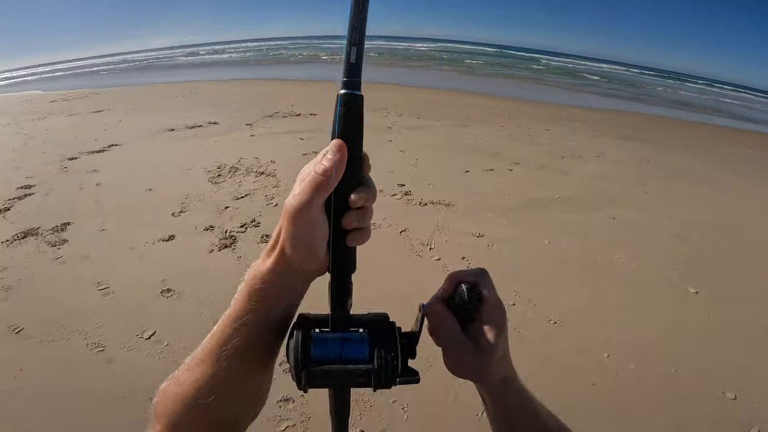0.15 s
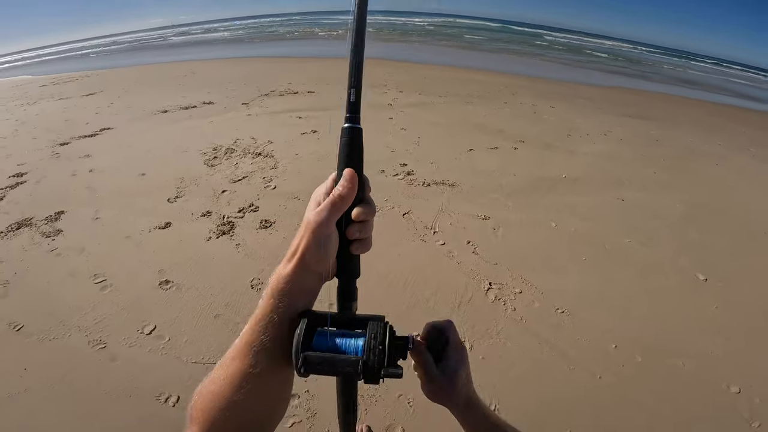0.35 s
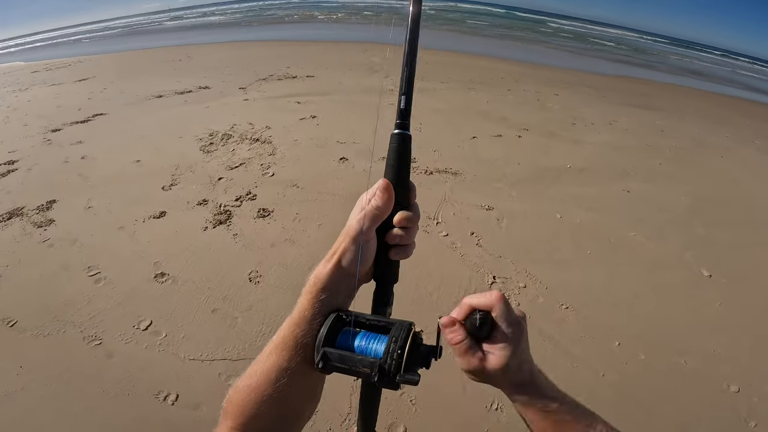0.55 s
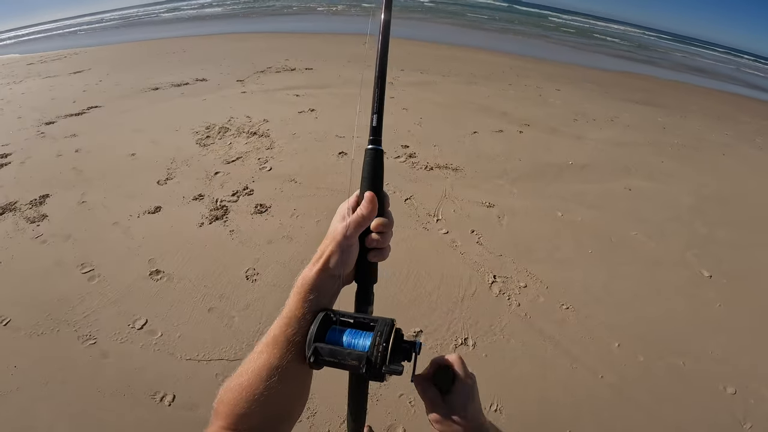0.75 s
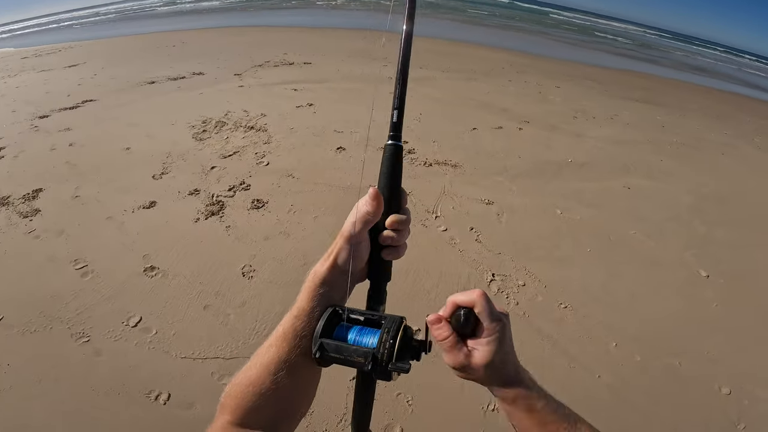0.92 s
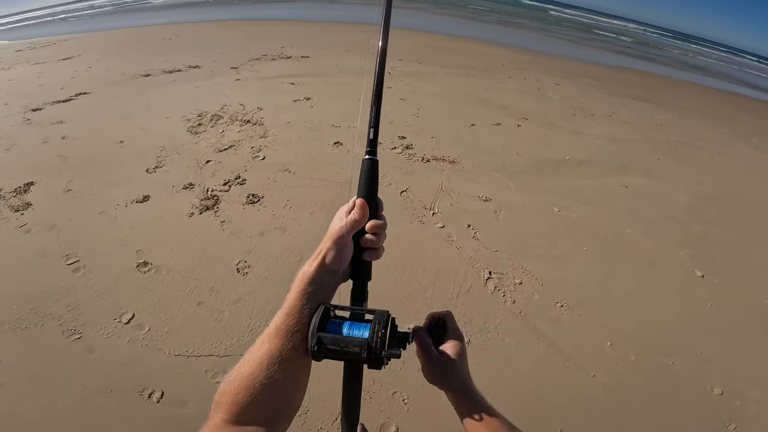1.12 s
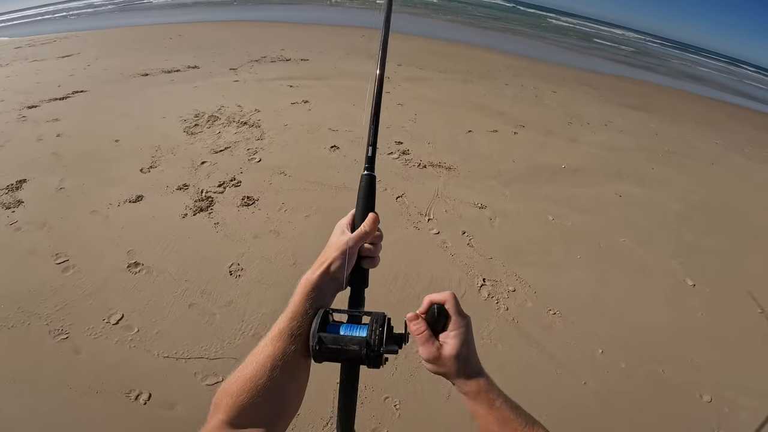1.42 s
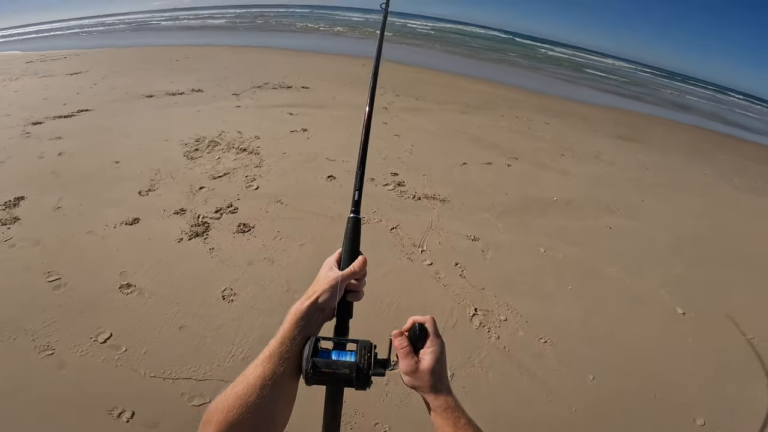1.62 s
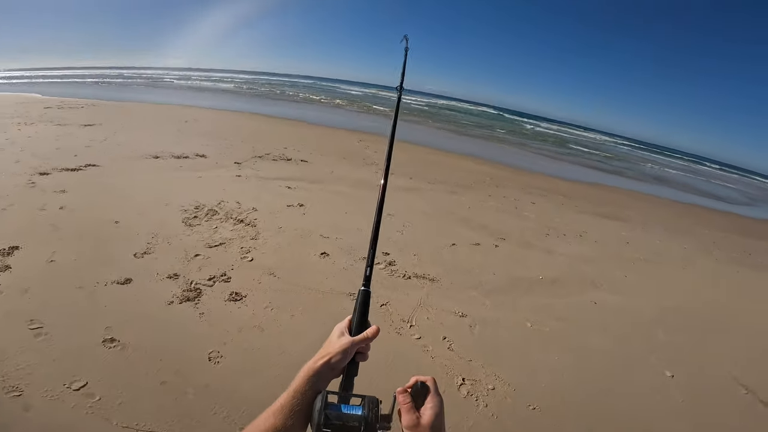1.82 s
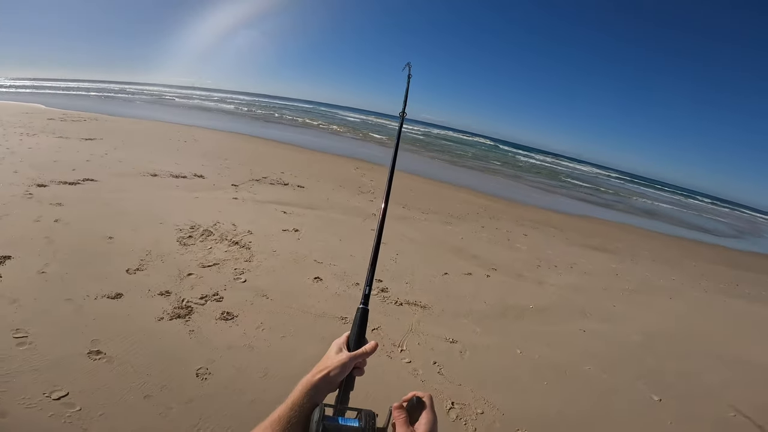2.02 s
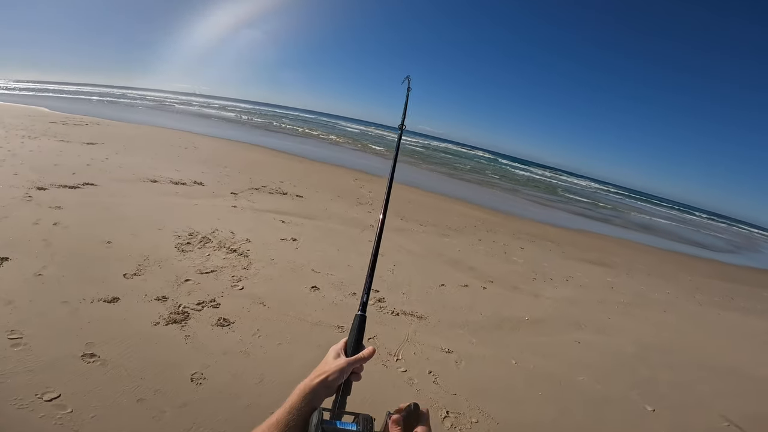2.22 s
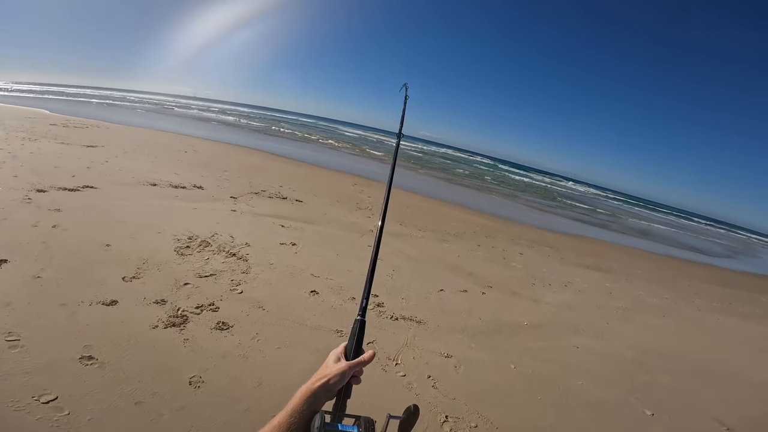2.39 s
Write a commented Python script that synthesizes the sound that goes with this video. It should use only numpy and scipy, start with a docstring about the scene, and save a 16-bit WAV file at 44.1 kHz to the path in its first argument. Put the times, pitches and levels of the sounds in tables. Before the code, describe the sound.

A fishing reel's clicker ticks, then buzzes in surges as line runs out on a windy beach

```python
"""Fishing reel on a beach

An overhead reel clicks close to a body-worn camera: its pawl ticks three times, then buzzes as line is pulled
off in surges, stops for a moment and runs on more evenly. Each click is a burst of noise plus ringing tones,
timed by the turning spool. Running line adds hiss. Shaped noise makes the surf, the wind and its low roar, with
short pulses for the buffets."""
import sys
import numpy as np
from scipy import signal
from scipy.fft import rfft, irfft
from scipy.io import wavfile
from scipy.ndimage import uniform_filter1d

SR = 44100
rng = np.random.default_rng(int(sys.argv[2]) if len(sys.argv) > 2 else 0)


def unload_wav(signal):
    """Save mono or channel-first audio to the path in sys.argv[1] as 16-bit WAV at rate SR, clipped to [-1, 1]."""
    wavfile.write(
        sys.argv[1],
        SR,
        np.round(np.clip(np.atleast_2d(signal).T, -1, 1) * 32767).astype(np.int16),
    )


N = 112454  # length in samples


def amp(db):
    """Turns decibels into gain."""
    return 10 ** (np.asarray(db) / 20)


def unit(x):
    """Scales a sound to rms 1."""
    return x / np.sqrt(np.mean(x ** 2) + 1e-20)


def at_hz(points, hz):
    """Reads a curve over frequency, on a logarithmic axis."""
    f, value = np.transpose(points)
    return np.interp(np.log(hz + 1), np.log(f + 1), value)


def at_time(points, s):
    """Reads a curve over time."""
    return np.interp(s, *np.transpose(points))


def add(mix, s, sound):
    """Mixes a stereo sound in at time s."""
    part = mix[:, max(round(s * SR), 0):][:, :sound.shape[1]]
    part += sound[:, :part.shape[1]]


def pair(noise, same):
    """Makes two independent noises partly alike (0 = unrelated, 1 = identical)."""
    same = np.clip(same, 0, 1)
    right = same * noise[0] + np.sqrt(1 - same ** 2) * noise[1]
    return np.array([noise[0], right])


def air(spectrum, level, same, flutter_db=0, flutter_hz=20):
    """Coloured stereo noise that follows a level curve and can flutter at random."""
    hz = np.fft.rfftfreq(N, 1 / SR)
    white = pair(rng.standard_normal((2, N)), same)
    noise = irfft(rfft(white) * amp(at_hz(spectrum, hz)), N)
    slow = np.exp(-(hz / flutter_hz) ** 2)
    flutter = unit(irfft(rfft(rng.standard_normal(N)) * slow, N))
    fluttering = unit(noise * amp(flutter_db * flutter))
    return fluttering * amp(at_time(level, np.arange(N) / SR))


# how far the left port leads the right: (frequency [Hz], phase [radians])
PORT_PHASE = [(30, -0.25), (500, -0.45), (3000, -0.92), (5300, -0.54), (8000, -0.32), (12000, 0.58)]


def ports(x, balance):
    """A sound reaches the two microphone ports with different level and phase."""
    hz = np.fft.rfftfreq(N, 1 / SR)
    # each port takes half of the difference, in opposite directions
    half = amp(at_hz(balance, hz) / 2) * np.exp(1j * at_hz(PORT_PHASE, hz) / 2)
    return irfft(rfft(x) * np.array([half, 1 / half]), N)


# colour of the surf: (frequency [Hz], relative level [dB per Hz])
SURF_COLOUR = [(100, -0.5), (220, 0), (400, -7), (750, -11.5), (960, -4), (1400, -11.5), (2300, -17.5),
               (3200, -24.5), (4500, -24.5), (6500, -30.5), (9000, -45), (14000, -50)]
# loudness of the surf: (time [s], level [dB])
SURF_LEVEL = [(0, -32.5), (.26, -33.5), (.33, -36), (1.0, -39), (1.5, -40), (1.63, -36), (1.75, -35),
              (2.55, -35)]


def surf():
    """The even wash of breakers down the beach: gently fluttering noise."""
    wash = air(SURF_COLOUR, SURF_LEVEL, same=0.88, flutter_db=1.72, flutter_hz=22)
    return ports(wash, [(200, -0.067), (1300, 0.64)])  # (Hz, left minus right dB)


# colour of the wind's low roar: (frequency [Hz], relative level [dB per Hz])
WIND_ROAR_COLOUR = [(80, -22), (230, 1), (450, 4.5), (750, -3.5), (2000, -44.5)]
# loudness of the wind's roar: (time [s], level [dB])
WIND_ROAR_LEVEL = [(0, -41.5), (.25, -37.5), (.35, -49.5), (1.45, -53), (1.6, -42.5), (1.72, -45.5),
                   (2.1, -42.5), (2.55, -43)]


def wind_roar():
    """The low-mid turbulence of the wind: low noise, only partly alike on the two sides."""
    return air(WIND_ROAR_COLOUR, WIND_ROAR_LEVEL, same=0.61)


# colour of the wind on the microphone: (frequency [Hz], relative level [dB per Hz])
WIND_COLOUR = [(3, -6.5), (10, 2.5), (22, -11), (45, -14.5), (100, -23.5), (180, -25.5), (400, -38.5),
               (1500, -108)]
# loudness of the wind: (time [s], level [dB])
WIND_LEVEL = [(0, -21.5), (.12, -22.5), (.25, -18.5), (.36, -22), (.55, -30.5), (.85, -22), (1.08, -28),
              (1.28, -22.5), (1.38, -20.5), (1.52, -25), (1.72, -25.5), (2.0, -26), (2.2, -29), (2.55, -28)]
# sharp buffets of wind: (time [s], peak level before the ports [dB], half width [s])
BUFFETS = [(0.205, -13.5, 0.0024), (.43, -22, 0.0026), (1.004, -21, 0.0034), (1.182, -22.5, 0.0036),
           (1.42, -18.5, 0.0025), (1.659, -21, 0.0032), (1.757, -18.5, 0.0023), (2.003, -22.5, 0.0035)]


def wind():
    """Wind pressing on the microphone: lumpy rumble with a few sharp pulses of pressure."""
    out = air(WIND_COLOUR, WIND_LEVEL, same=0.96)
    for s, db, width in BUFFETS:
        u = (np.arange(N) / SR - s) / width
        # a dip with a small rise on either side
        out = out - amp(db) * (1 - u ** 2) * np.exp(-u ** 2 / 2)
    return ports(out, [(25, -4.0), (90, -4.5), (250, 1.0)])  # (Hz, left minus right dB)


def tooth_times(pull):
    """The pawl drops each time the spool has turned by one tooth."""
    t = np.arange(pull[0][0], pull[-1][0], 1 / SR)
    teeth = np.cumsum(at_time(pull, t)) / SR
    return np.interp(np.arange(int(teeth[-1]) + 1), teeth, t)


EVENNESS = 0.65  # how alike the teeth are in colour (0-1)


def evened(burst, size=56):
    """Partly flattens a burst's broad humps, so that every tooth strikes with much the same colour."""
    z = rfft(burst)
    power = (abs(z) ** 2).mean(0)
    humps = uniform_filter1d(uniform_filter1d(power, size), size)
    return irfft(z / np.sqrt(humps) ** EVENNESS, burst.shape[1])


# left-right likeness of the clicks: (frequency [Hz], likeness [0-1])
REEL_SAME = [(1000, 0.99), (6500, 1), (10000, 0.67), (13000, 0.55)]
# ringing metal parts of the reel: (frequency [Hz], time to fall 60 dB [s], then typical level [dB]
# in the first surge, the later surges, the easing pull and the even pull)
REEL_MODES = [(1633, 0.039, -30, -32, -35, -55), (2094, 0.023, -34, -37, -38, -29),
              (2834, 0.031, -27.5, -26.5, -32, -30), (3926, 0.043, -23, -55, -45, -41),
              (4674, 0.036, -39, -28, -28, -39), (6120, 0.04, -42, -36, -50, -31),
              (7880, 0.04, -42, -33, -41, -29), (10340, 0.042, -28, -26, -27, -30.5)]
# ends of the first three of those stages: (time [s])
STAGE_ENDS_S = [.46, 1.07, 1.6]

CLICK_DB, SPREAD_DB = -6.5, 1.11  # base strength of a click and its random spread
LIKENESS = 0.71  # how much a click's noise resembles the one before (0-1)
# the pawl rides over a tooth, drops, and dies away: typical times, which vary from click to click
SCRAPE_S, HOLD_S, SNAP_S = 0.00059, 0.001, 0.00056
SHORTENING_PER_DB = .1  # a harder snap is over sooner
BODY_DB, BODY_S = -13, 0.006  # after-ring of the frame, weaker for soft ticks
TOOTH_COLOUR_DB, TOOTH_COLOUR_HZ = 4, 690  # no two teeth are worn alike: random tint, spacing of its bumps
LENGTH_SPREAD, JITTER_S = 0.33, .00008  # teeth differ in click length (share) and in spacing
RING_SPREAD_DB, RING_DETUNE = 2.5, 0.0038  # each ring varies in level and pitch (share)
RING_GROWTH = 0.96  # extra dB the ring loses per dB of softness


def pawl(clicks, size=2600):
    """Each drop of the pawl gives a short burst of metal chatter and sets the reel's parts ringing."""
    lead = SR // 400 / SR  # room before the drop for the scrape, s
    t, hz = np.arange(size) / SR - lead, np.fft.rfftfreq(size, 1 / SR)
    after, same = np.maximum(t, 0), at_hz(REEL_SAME, hz)
    chatter, ring = np.zeros((2, 2, N))
    grain = rng.standard_normal((2, size))
    for s, db in clicks:
        softness, hardness = min(db, 0), max(db, 0)
        # part of the last click's noise lives on in this one
        grain = LIKENESS * grain + np.sqrt(1 - LIKENESS ** 2) * rng.standard_normal((2, size))
        bumps = rng.standard_normal(size=48)
        tint = amp(TOOTH_COLOUR_DB * np.interp(hz / TOOTH_COLOUR_HZ, np.arange(len(bumps)), bumps))
        # stretched time makes some clicks shorter than others
        u = t * np.exp(LENGTH_SPREAD * rng.standard_normal() + SHORTENING_PER_DB * hardness)
        scrape = np.exp(np.minimum(u, 0) / SCRAPE_S)
        snap = np.exp(-np.maximum(u - HOLD_S, 0) / SNAP_S)
        body = amp(BODY_DB + RING_GROWTH * softness) * np.exp(-after / BODY_S)
        noise = irfft(pair(rfft(grain), same) * tint, size)
        burst = evened(noise * scrape * (snap + body))
        strength = amp(CLICK_DB + db + SPREAD_DB * rng.standard_normal())
        start = s - lead + JITTER_S * rng.standard_normal()
        add(chatter, start, 2 * strength * burst / np.linalg.norm(burst[0]))
        # soft ticks barely excite the ring; hard ones add only snap
        ring_strength = strength * amp(RING_GROWTH * softness - hardness)
        for mode_hz, t60, *stage_db in REEL_MODES:
            mode_db = stage_db[np.searchsorted(STAGE_ENDS_S, s)] + RING_SPREAD_DB * rng.standard_normal()
            tone_hz = mode_hz * (1 + RING_DETUNE * rng.standard_normal())
            fade = np.exp(-np.log(1000) * after / t60)
            mode = amp(mode_db) * fade * np.sin(2 * np.pi * tone_hz * after)
            add(ring, start, ring_strength * np.array([mode, mode]))
    return chatter, ring


def ringing(colour, size=2048):
    """A short response of energy 1 with the given colour, starting at once like a struck object."""
    log_gain = np.log(amp(at_hz(colour, abs(np.fft.fftfreq(size, 1 / SR)))))
    # the Hilbert transform gives the phase that puts the energy as early as possible
    response = np.fft.ifft(np.exp(np.conj(signal.hilbert(log_gain)))).real[:size // 2]
    return response / np.linalg.norm(response)


# wandering colour of the clicks: (time [s], gain of the lower band [dB], gain of the upper band [dB])
WANDER = [(.1, 10, 7.5), (.277, -4.5, -1.5), (.32, -7.5, 0.5), (.38, -1, -4.5), (.46, -10, 3),
          (.52, 2.5, -1.5), (.59, -2, 0.5), (.66, 3.5, -2), (.71, 4, -0.5), (.77, -12, 5.5), (.83, -4, 3.5),
          (.9, 1, -3), (.97, -7, 3), (1.04, 3, 0.5), (1.11, -11, 2), (1.2, 1, 2.5), (1.5, -1, 1.5),
          (1.72, -2, -1.5), (1.9, 1.5, -2.5), (2.15, 5, 2.5), (2.55, 4, 1.5)]
WANDER_HZ, WANDER_WIDTH_HZ = (3750, 5220), 830  # band centres and width


def wander(x):
    """Lets two middle bands of the clicks swell and sink."""
    hz, t = np.fft.rfftfreq(N, 1 / SR), np.arange(N) / SR
    times, *gains_db = np.transpose(WANDER)
    out = x
    for centre, db in zip(WANDER_HZ, gains_db):
        band = irfft(rfft(x) * np.exp(-((hz - centre) / WANDER_WIDTH_HZ) ** 2), N)
        out = out + band * (amp(np.interp(t, times, db)) - 1)
    return out


# single ticks while the line only creeps: (time [s], level relative to the base click [dB])
TICKS = [(.0707, -16), (.146, -14), (.162, -12), (1.6572, 0.5), (1.6774, 3), (1.6955, 3), (1.7095, 1.5),
         (1.7212, 0), (1.73, 0)]
# spool speed in the surging and in the even pull: (time [s], speed [teeth per second])
SURGING_PULL = [(0.277, 51.3), (0.302, 68.7), (0.342, 150.3), (0.375, 163.4), (0.422, 148.9),
                (0.462, 163.0), (0.503, 197.1), (0.535, 163.9), (0.562, 156.1), (0.645, 223.0),
                (0.654, 253.1), (0.712, 91.4), (0.737, 84.9), (0.781, 222.4), (0.849, 220.8),
                (0.899, 113.8), (1.0, 176.0), (1.004, 197.9), (1.042, 202.7), (1.071, 88.4), (1.11, 36.5),
                (1.162, 118.4), (1.2, 136.7), (1.232, 123.8), (1.295, 132.8), (1.357, 55.4), (1.412, 61.0),
                (1.457, 88.9), (1.542, 67.9), (1.582, 25.1)]
EVEN_PULL = [(1.748, 49.3), (1.78, 50.2), (1.84, 56.6), (1.95, 65.2), (2.04, 68.0), (2.09, 82.0),
             (2.18, 81.0), (2.22, 86.8), (2.26, 82.6), (2.315, 101.5), (2.37, 91.8), (2.46, 93.7),
             (2.548, 103.4)]
# strength of the pawl's snap while line runs: (time [s], level relative to the base click [dB])
FORCE = [(.277, 5.5), (.3, 1.5), (.35, 0.5), (.45, 1.5), (.52, 0.5), (.68, 1), (.76, -2), (.86, 0.5),
         (1.03, -0.5), (1.09, 2.5), (1.11, 1), (1.129, 2), (1.143, -2), (1.17, 0), (1.34, 0.5), (1.42, 1),
         (1.58, 1), (1.78, 3), (1.858, 0.5), (2.1, -0.5), (2.3, -1.5), (2.55, -0.5)]
# colour of the first soft ticks, then of the clicks under a hard, an easing and a light pull:
# (frequency [Hz], relative level [dB per Hz])
COLOUR_SOFT = [(500, -21), (2300, -11), (3100, 4.5), (4600, -8), (6000, 2.5), (7800, -0.5), (9000, -10.5),
               (12800, -9), (15000, -25)]
COLOUR_HARD = [(300, -22.5), (800, -37), (1200, -20), (1600, -19), (1850, -17.5), (2120, -12.5),
               (2400, -22), (2650, -21), (2850, -12), (3300, -8), (4100, -3.5), (5000, -7.5), (6800, 0.5),
               (7600, -5.5), (8600, -17), (9800, -12.5), (11000, -11.5), (12400, -19), (13400, -12),
               (15000, -47)]
COLOUR_EASING = [(300, -18), (1200, -21.5), (2100, -18.5), (2500, -27), (2850, -9.5), (3300, -16.5),
                 (4500, -10), (4950, -11.5), (5600, -5), (6300, -5), (7200, -6), (8900, -20.5),
                 (11000, -14.5), (12700, -27.5), (13700, -21), (15000, -40)]
COLOUR_LIGHT = [(300, -21), (1400, -14), (2000, -3.5), (2550, -14), (2800, 1.5), (3050, -0.5), (3450, -8),
                (3850, -0.5), (4200, -4.5), (4550, -2.5), (5000, -8), (5800, 1.5), (7000, 0.5), (7500, -2),
                (8300, -4), (9100, -12), (11900, -11.5), (13700, -13.5), (15000, -28)]
# the reel at the two ports: (frequency [Hz], left minus right [dB])
REEL_BALANCE = [(500, -0.5), (2400, 2), (4400, 1.5), (7000, 3.5), (10000, 1.5), (13000, 6)]

HARD_UNTIL_S, EASING_FROM_S, EASING_UNTIL_S, LIGHT_FROM_S = 1.05, 1.17, 1.56, 1.75
ECHO_S, ECHO_DB = .0065, -24  # reflection from the angler's body and the sand


def reel():
    """The clicks sound through the reel's frame, whose colour changes from pull to pull."""
    times = np.concatenate([tooth_times(SURGING_PULL), tooth_times(EVEN_PULL)])
    chatter, ring = pawl(TICKS + list(zip(times, at_time(FORCE, times))))
    t = np.arange(N) / SR
    running = t > SURGING_PULL[0][0] - ECHO_S
    hard = running * np.interp(t, [HARD_UNTIL_S, EASING_FROM_S], [1, 0])
    light = running * np.interp(t, [EASING_UNTIL_S, LIGHT_FROM_S], [0, 1])
    easing = running - hard - light
    pulls = [(~running, COLOUR_SOFT), (hard, COLOUR_HARD), (easing, COLOUR_EASING), (light, COLOUR_LIGHT)]
    direct = ring
    for share, colour in pulls:
        direct = direct + signal.oaconvolve(chatter * share, ringing(colour)[None], axes=1)[:, :N]
    out = direct.copy()
    add(out, ECHO_S, amp(ECHO_DB) * direct)
    return ports(wander(out), REEL_BALANCE)


# colour of the hiss of line and spool: (frequency [Hz], relative level [dB per Hz])
HISS_COLOUR = [(500, -11), (2100, -0.5), (2500, -3.5), (2900, 2.5), (6500, -9), (9000, -7), (13500, -7.5),
               (15000, -43)]
HISS_DB = -42  # level at 100 teeth per second


def line_hiss():
    """Line sliding off the spool hisses more the faster it runs."""
    t = np.arange(N) / SR
    speed = sum(np.interp(t, *np.transpose(pull), left=0, right=0) for pull in (SURGING_PULL, EVEN_PULL))
    gain = (speed / 100) ** .8
    hiss = air(HISS_COLOUR, [(0, HISS_DB)], same=1.0, flutter_db=3, flutter_hz=300)
    return ports(gain * hiss, REEL_BALANCE)


def scene():
    """Surf, wind roar, wind, reel and running line together."""
    return surf() + wind_roar() + wind() + reel() + line_hiss()


def record(dry):
    """The camera's band limits: it loses the very lowest and the very highest sound."""
    dry = signal.sosfilt(signal.butter(1, 5, "high", fs=SR, output="sos"), dry)
    lowpass = signal.firwin(101, 14700, window=("kaiser", 9), fs=SR)  # cutoff in Hz
    return signal.oaconvolve(dry, lowpass[None], "same")


dry = scene()
out = record(dry)
unload_wav(out)
```